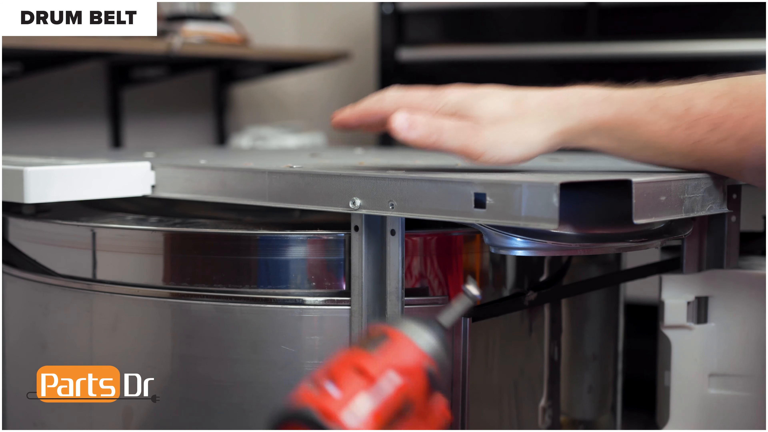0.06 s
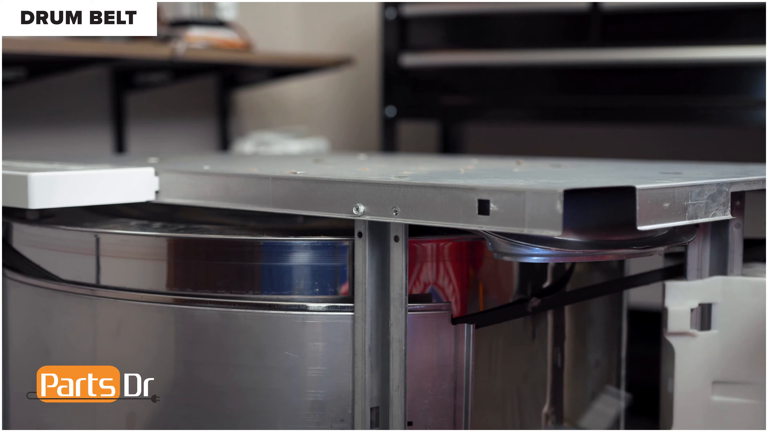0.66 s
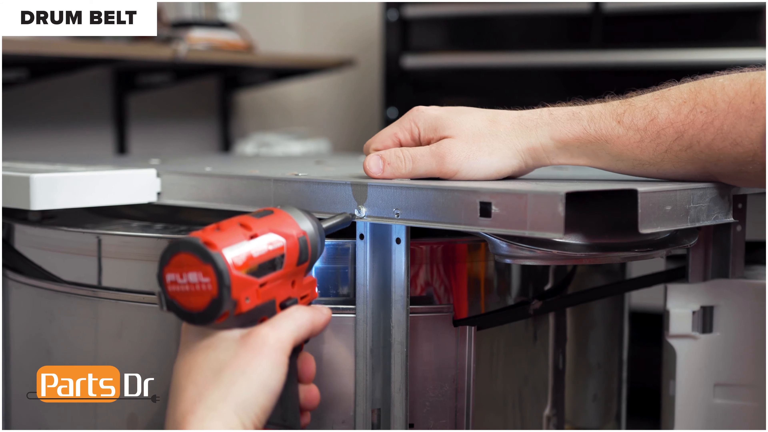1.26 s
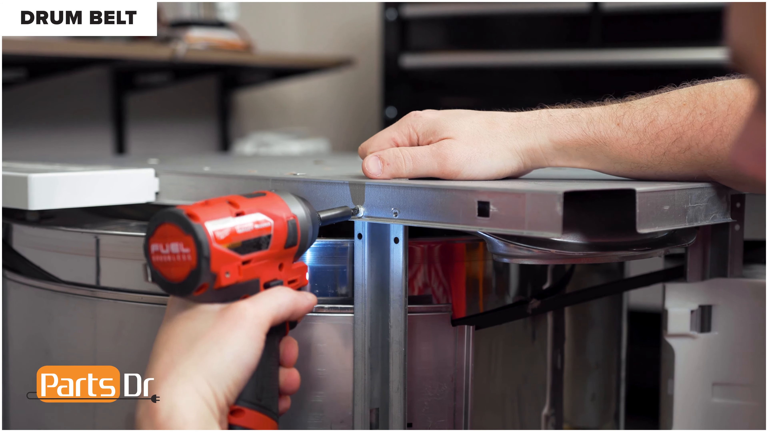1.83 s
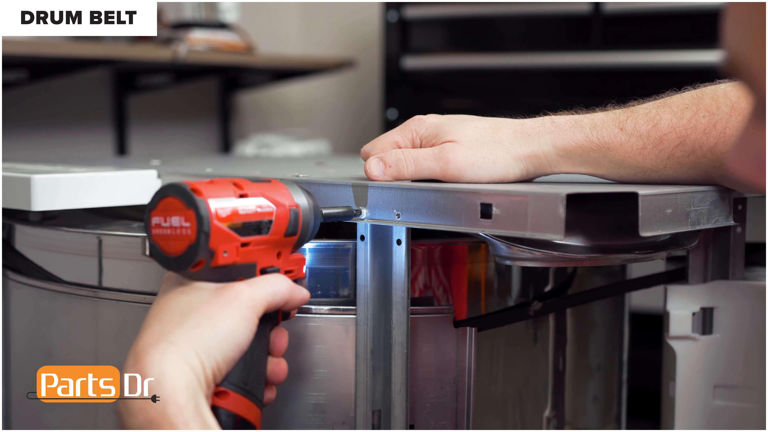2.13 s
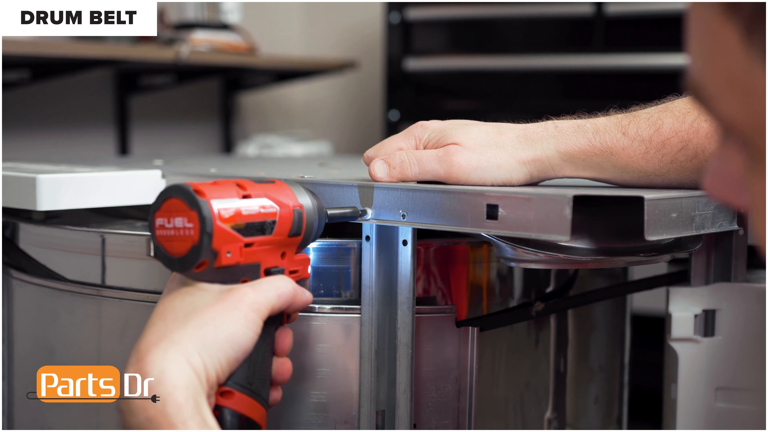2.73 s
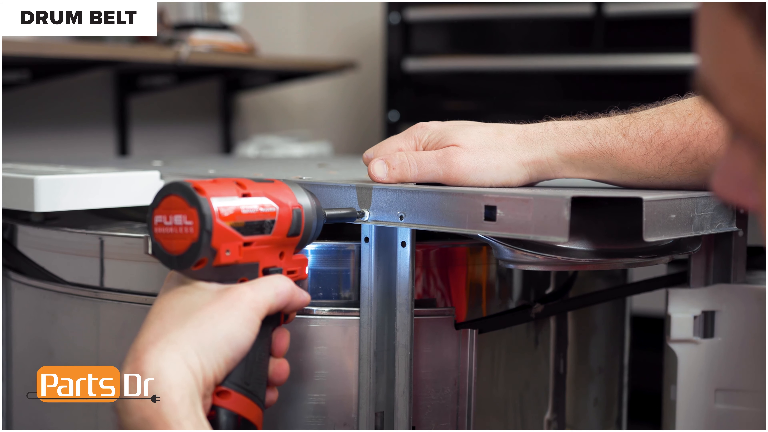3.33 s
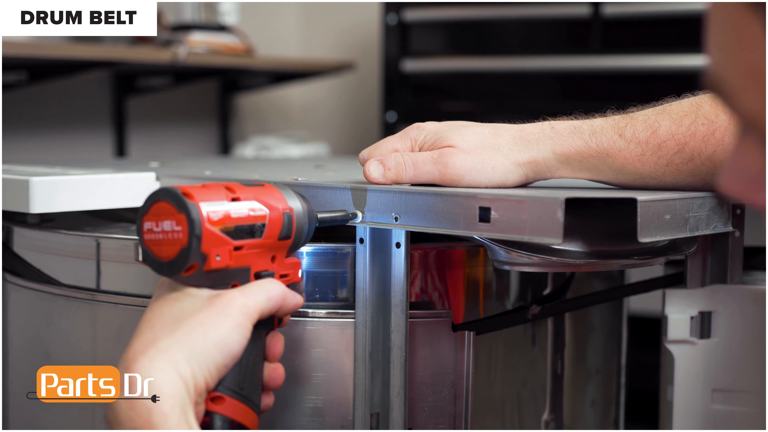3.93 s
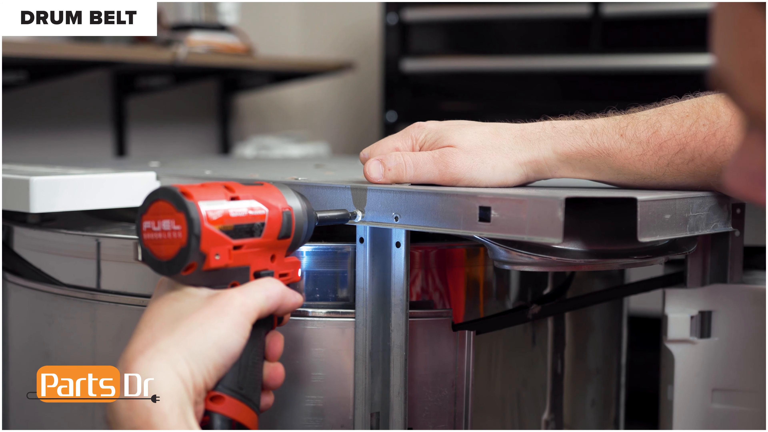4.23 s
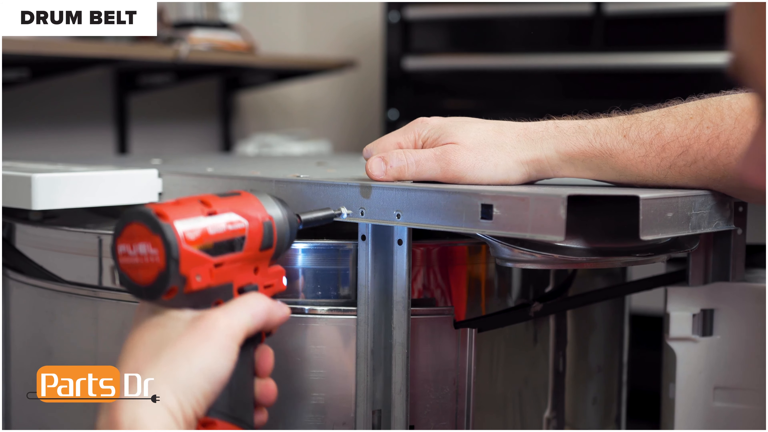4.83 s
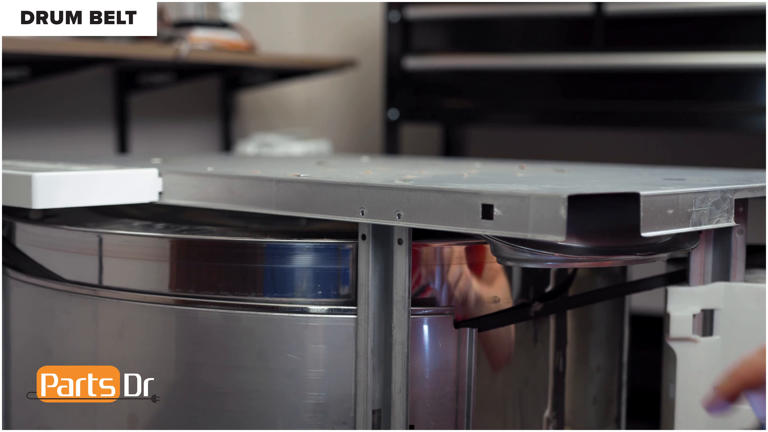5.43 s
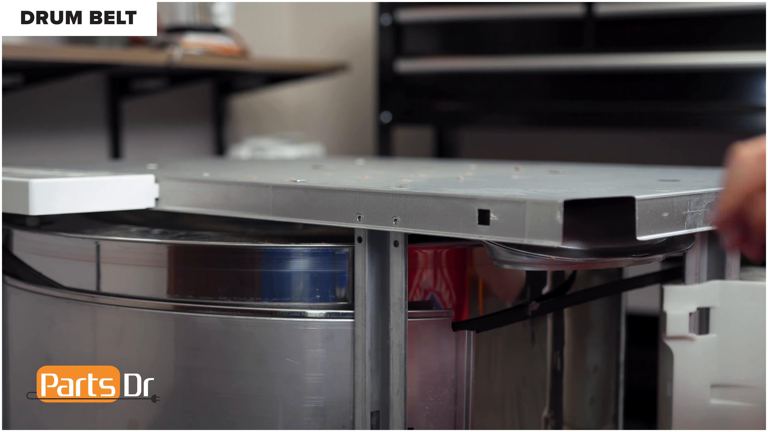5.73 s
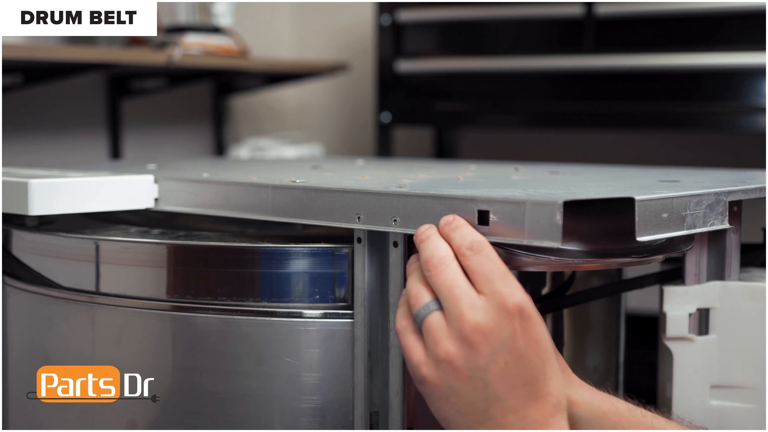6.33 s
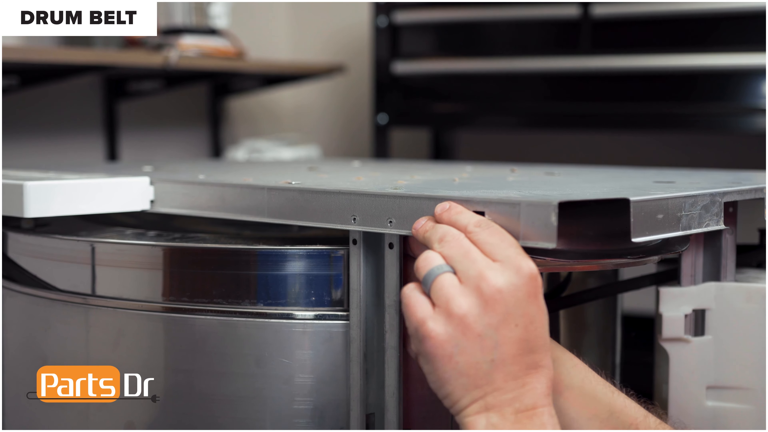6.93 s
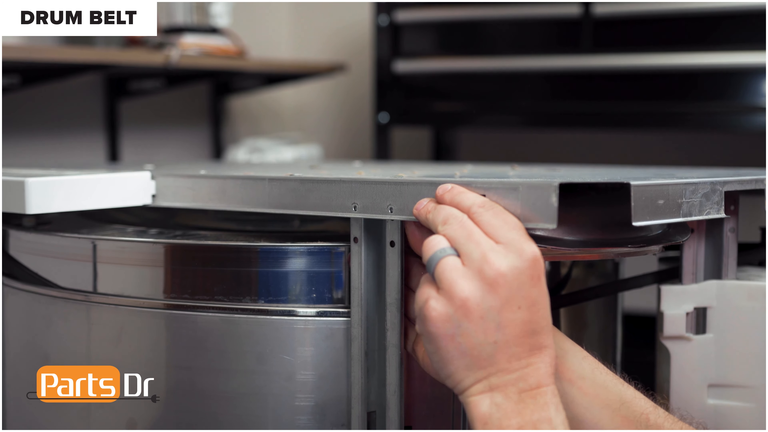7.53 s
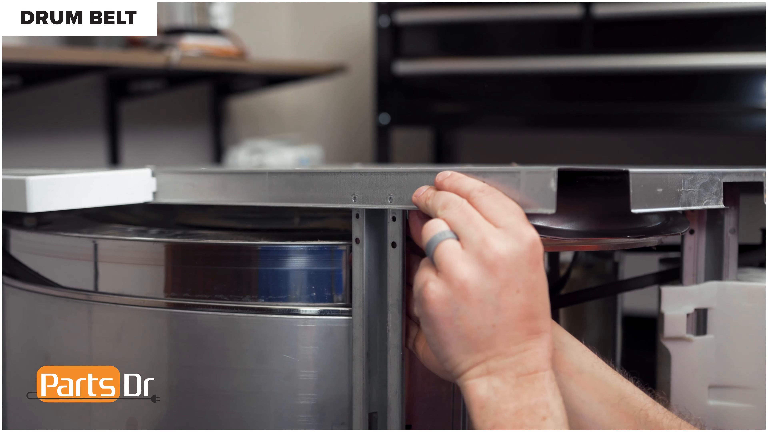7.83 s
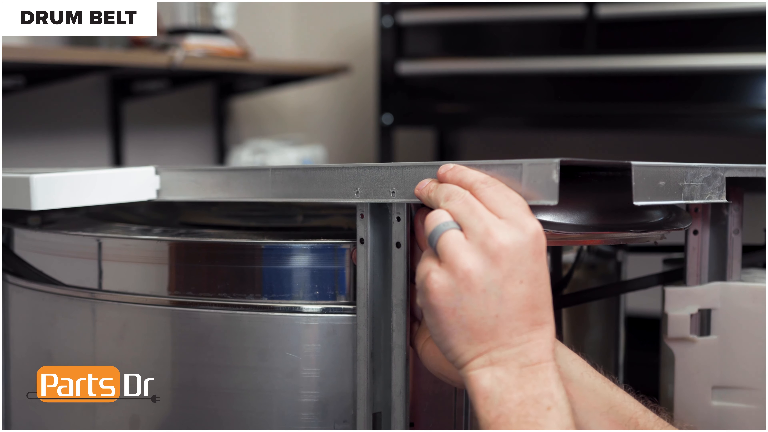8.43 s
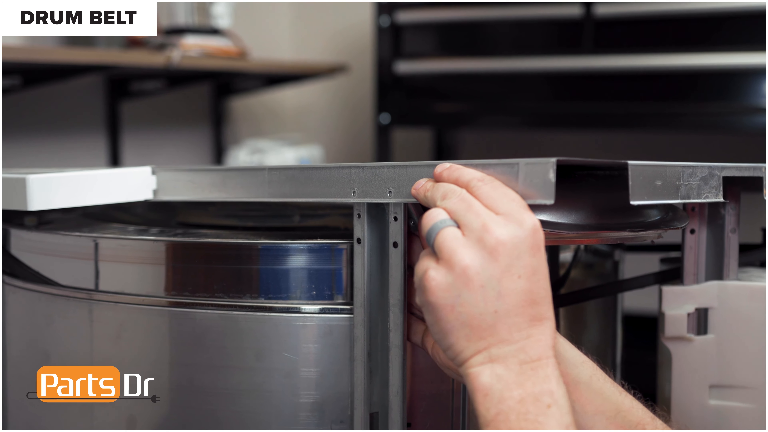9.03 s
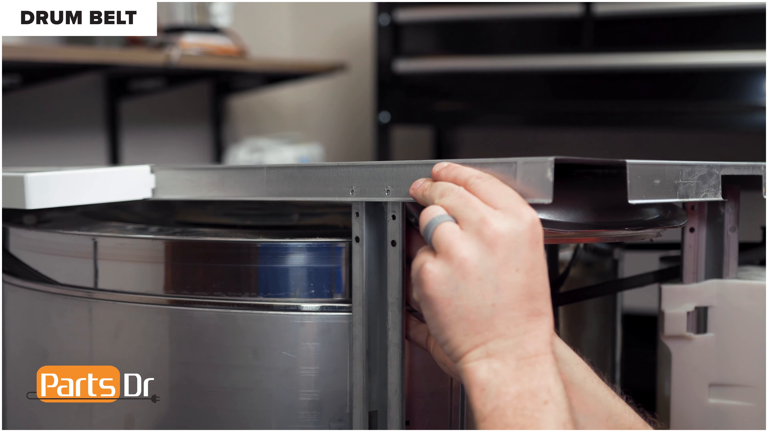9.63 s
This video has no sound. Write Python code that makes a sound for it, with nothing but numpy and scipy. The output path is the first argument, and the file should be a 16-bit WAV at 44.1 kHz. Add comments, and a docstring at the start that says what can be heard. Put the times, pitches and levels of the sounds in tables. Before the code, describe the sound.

Soft rubbing and small ticks open over the low, steady air of a quiet workshop. Between 1.4 and 1.9 seconds a driver bit knocks a few times on a screw in a steel post, followed by light ticks. At 2.7 seconds a cordless impact driver starts whining and rattling; the screw cracks loose with the loudest snap and grinds until about 3.2. A second, faster run starts at 3.5, with a few metallic knocks, and winds down to a sharp click at 4.3. A tiny blip follows at 4.5, then a small pop and faint handling rubs around 5. From about 6.3 seconds hands push up the washing machine's sheet-metal top panel, much more quietly: small creaks and dull knocks, scraping with short low groans from 7.4 to 8.4, and bracket chinks with two brief squeaks near 8.7. Faint creaks and knocks continue until about 9.6.

```python
"""A cordless impact driver backs a screw out of a washing machine's steel post in a quiet workshop.
The bit knocks onto the screw and the motor runs twice: meshing gears whine and rattle, the thread
cracks loose and grinds, and the driver gives a last short blip. Two hands then push up the sheet-metal
top panel: impacts excite its modes, and stick-slip friction on its brackets scrapes, creaks and groans."""
import sys
import numpy as np
from scipy import signal
from scipy.fft import rfft, irfft, next_fast_len
from scipy.io import wavfile
from scipy.ndimage import uniform_filter1d

SR = 44100
rng = np.random.default_rng(int(sys.argv[2]) if len(sys.argv) > 2 else 0)


def digitize_waveform(pressure):
    """Quantize a signal to 16-bit integers and store it at the path in sys.argv[1].

    Rows of a 2-D input are taken as channels; values are limited to [-1, 1].
    """
    field = np.atleast_2d(pressure).T
    bounded = np.clip(field, -1, 1)
    quanta = np.round(bounded * 32767).astype(np.int16)
    wavfile.write(sys.argv[1], SR, quanta)


N = 426447
TIME = np.arange(N) / SR
WORKING_HZ = 300   # the motor's field rate at working speed

# Strong modes of the post, the top panel and a bracket: pitch_hz, level_db, t60_s
POST_MODES = [(128, -7.5, 0.5), (201.3, -19.5, 0.5), (256, -13.5, 0.26), (468.4, -13, 0.94),
              (508.5, -10, 0.46), (536, -3.5, 0.28), (602.3, -9.5, 0.25), (677, -9.5, 0.11),
              (742, -9.5, .2), (887, -3, 0.21), (909, -4.5, 0.14), (965, -1.5, 0.092), (1130, -14.5, 0.2),
              (1196, -14.5, .14), (1443, -8.5, 0.35), (1925, -3.5, 0.17), (2487, -2, .13),
              (2674, -6.5, 0.11), (2775, -5, 0.1), (3200, -10.5, 0.17), (4270, -16, 0.18)]
PANEL_MODES = [(121.3, 2, 0.65), (212, 6.5, 0.13), (262.5, -5.5, 0.82), (382, 5, 0.22), (411, -4.5, 0.76),
               (482.3, 1.5, 0.27), (517, -7.5, 0.69), (850, -7.5, 0.61), (930, -4, 0.28), (1064, -5, 0.37),
               (1130, -6, 0.31), (1130, -19, 0.19), (1320, 1.5, 0.16), (1850, -2, 0.25), (2260, 5.5, 0.1),
               (3430, -8, 0.1)]
BRACKET_MODES = [(2300, -18, 0.32), (2850, -4, 0.4), (3060, 6.5, 0.17), (3620, 0, 0.16), (5570, -11, 0.2),
                 (6300, 1, 0.082), (7430, -7, 0.17)]
# Spectra of the dense modes of post and panel: frequency_hz, density_db
POST_WASH = [(60, -2.5), (125, 5.5), (245, -2), (350, -4), (500, 3.5), (660, 1.5), (900, 4.5), (1200, -2.5),
             (1900, 1), (2700, 5.5), (3600, -14.5), (4700, -7.5), (6000, -10.5), (9000, -12), (16000, -20)]
PANEL_WASH = [(60, -14), (120, 1), (250, 2.5), (450, 4), (900, 4), (1450, 1.5), (2200, -1), (3200, -3),
              (4500, -9), (6500, -10.5), (10000, -9), (16000, -27)]
# Decay of the steel's dense modes and the room: frequency_hz, t60_s
STEEL_DECAY = [(100, 0.88), (260, 0.73), (700, 0.36), (1500, 0.32), (3000, 0.23), (4500, 0.22),
               (6000, 0.16), (13000, 0.11)]
# Spectrum of sliding friction: frequency_hz, density_db
FRICTION_SPECTRUM = [(1000, -5.5), (2500, 3), (4500, -2), (7000, -5.5), (11000, -10.5), (16000, -9.5)]


def driver(loose_s=2.80, field_cycles_per_turn=29):
    """Load modulation: once loose, the thread binds once a turn, slowing the gears and grinding harder."""
    field_hz = motor_speed()
    turning = TIME > loose_s
    binding = np.cos(2 * np.pi * np.cumsum(field_hz * turning) / (field_cycles_per_turn * SR))
    sound = gears(field_hz, binding) + turning * thread_grind(field_hz, binding)
    return workshop(sound, wet_db=-16.5, t60_s=0.26)


def motor_speed():
    """A rotating field drives the motor: its rate in Hz, zero outside the two runs."""
    # Speed curves of the two trigger pulls: time_s, field_hz
    first_run = [(2.664, 41), (2.70, 188), (2.76, 172), (2.81, 234), (2.86, 287), (2.89, 306), (2.92, 283),
                 (2.95, 307), (2.99, 315), (3.025, 305), (3.065, 280), (3.11, 207), (3.175, 42),
                 (3.24, 2.84)]
    second_run = [(3.495, 20), (3.53, 195), (3.575, 380), (3.62, 477), (3.66, 497), (3.70, 507),
                  (3.735, 489), (3.78, 441), (3.83, 394), (3.895, 351), (3.991, 308), (4.07, 238),
                  (4.15, 210), (4.235, 140), (4.30, 140), (4.339, 3)]
    return sum(np.interp(TIME, *np.transpose(run), left=0, right=0) for run in (first_run, second_run))


def effort(field_hz, level_db, decade_db, loose_db):
    """Gain follows speed and load: up decade_db per tenfold speed, down loose_db as the screw comes out."""
    backed_out = np.cumsum(field_hz) / field_hz.sum()
    decades = np.log10(field_hz / WORKING_HZ + 1e-9)
    return from_db(level_db + decade_db * decades - loose_db * backed_out)


def gears(field_hz, binding, mesh_per_cycle=.778, sag=.012, jitter=.006, flutter_db=6.5):
    """Gear meshing: loaded teeth whine at harmonics of the mesh rate, slack ones rattle."""
    # Partials of the whine: mesh_multiple, level_db
    orders = [(6, -4), (7, -6.5), (8, -4), (9, -1.5), (10, -5.5), (11, -8), (12, 1.5), (13, -6), (14, 1),
              (15, -6.5), (16, -1.5), (17, -6), (18, -1), (19, -5.5), (20, -2.5), (22, -3), (24, -2),
              (26, -4.5), (28, -3), (32, -4)]
    # Radiation efficiency of the gear case: frequency_hz, gain_db
    radiation = [(500, -8), (1500, -7), (2300, -3.5), (2750, -1.5), (3050, -1), (3300, 3.5), (3550, 3),
                 (3850, -8), (4650, -11.5), (5400, -11), (7500, -13.5), (12000, -22)]
    mesh_hz = mesh_per_cycle * field_hz * (1 - sag * binding + jitter * drift(160))
    mesh = 2 * np.pi * np.cumsum(mesh_hz) / SR
    whine = rms_one(sum(from_db(db + flutter_db * drift(70)) * np.sin(round(k) * mesh)
                        for k, db in orders))
    whine = even(colour(whine + resonances(whine), radiation))   # partials flare at each resonance
    whine_share = np.clip(field_hz / WORKING_HZ, 0, 1) * effort(field_hz, 1.5, decade_db=0, loose_db=6)
    field_pulse = 1 + 0.37 * np.cos(mesh / mesh_per_cycle)
    rattle = rms_one(grains(7000, 1.5) * field_pulse * from_db(1.5 * drift(180)))
    teeth = workshop(housing(rattle) + whine_share * whine, wet_db=-9, t60_s=0.15)
    return effort(field_hz, -24.5, decade_db=24, loose_db=11) * even(teeth)


def housing(x):
    """Radiation from the gear case shapes the spectrum of a rattle."""
    # Radiated spectrum: frequency_hz, density_db
    spectrum = [(180, -29), (300, -10), (511, -1), (645, -9.5), (930, -4), (1230, -8), (1430, -3),
                (1640, -7.5), (2700, -3.5), (4440, -9.5), (5340, -12.5), (7500, -14.5), (9880, -18.5),
                (16000, -30.5)]
    return colour(x + resonances(x), spectrum)


def resonances(x):
    """Resonance of the gear case and bit favours a few pitches."""
    # Resonant peaks: pitch_hz, width_hz, weight_db (halved in use)
    peaks = [(887, 170, 2), (1390, 70, -2), (2080, 30, -5.5), (2656, 70, 3), (2866, 55, 1), (3300, 110, -3),
             (5370, 100, -3.5), (7610, 490, -15), (8620, 56, -19)]
    return sum(from_db(db / 2) * signal.lfilter(*signal.iirpeak(hz, hz / width_hz, fs=SR), x)
               for hz, width_hz, db in peaks)


def thread_grind(field_hz, binding, lag_s=0.058, binding_db=2.5):
    """Friction in the turning thread drives the post's damped modes with random slips."""
    # Filter on the grinding: frequency_hz, gain_db
    spectrum = [(30, -25), (70, -9.5), (95, -7.5), (125, -4.5), (180, -4), (270, -1), (380, -4), (510, -11),
                (640, -13.5), (930, -8), (1400, -11.5), (2200, -17), (3500, -33.5)]
    slips = grains(900, 2.2) * from_db(7.1 * drift(40))
    post = steel(POST_MODES, POST_WASH, modes_db=-23.5) * np.exp(-TIME[:SR] / 0.028)
    grind = even(colour(excite(slips, post), spectrum))
    pole = np.exp(-1 / (lag_s * SR))   # the screw follows the motor's speed late
    lagged_hz = np.minimum(signal.lfilter([1 - pole], [1, -pole], field_hz), 3 * field_hz)
    return effort(lagged_hz, -29, decade_db=19, loose_db=13) * from_db(binding_db * binding) * grind


def hammer(pitch_hz=3450, width_hz=130, level_db=-44, loudest_at_hz=80):
    """Mechanical play lets the hammer jingle at its resonance while the motor starts and stops."""
    speed_squared = (motor_speed() / loudest_at_hz) ** 2
    resonator = signal.iirpeak(pitch_hz, pitch_hz / width_hz, fs=SR)
    ring = rms_one(signal.lfilter(*resonator, grains(1500, 1.5)))
    return from_db(level_db) * speed_squared * np.exp(1 - speed_squared) * ring


def inverter(switching_hz=9803, carrier_db=-67.5, press_s=2.665, release_s=4.305):
    """Amplitude modulation: turning under load adds two sidebands to the motor's switching tone."""
    field_hz = motor_speed()
    field_phase = 2 * np.pi * np.cumsum(field_hz) / SR
    trigger = uniform_filter1d(1. * (TIME > press_s) * (TIME < release_s), size=200)
    load = effort(field_hz, -49.5, decade_db=0, loose_db=5.5) * np.minimum(field_hz / WORKING_HZ, 1)
    amplitude = np.sqrt(2) * from_db(carrier_db) + 2 * load * from_db(3 * drift(25)) * np.cos(field_phase)
    return trigger * amplitude * np.sin(2 * np.pi * switching_hz * TIME)


def driver_blip(start_s=4.52, length_s=0.078, level_db=-42.5):
    """A last short rattle of the driver's mechanism excites the case's resonances, brightest at its peak."""
    burst = strokes([(start_s, length_s, 0)], attack_s=0.04, release_s=0.023)
    hiss = from_db(-18) * burst ** 2 * colour(grains(5000, 3.6), FRICTION_SPECTRUM)
    bite = from_db(-8) * rms_one(band(grains(1500, 2.3), 2600, 3500))
    body = from_db(0.5) * band(housing(grains(4800, 1.6)), 420, 10000)
    return workshop(from_db(level_db) * burst * (body + bite + hiss), wet_db=-6.5, t60_s=0.23)


def post_knocks():
    """Impacts of bit, hammer and screw set the steel post vibrating freely."""
    # Impacts: start_s, level_db, bright_db, thud_db, boom_db, tail_db, build_s
    impacts = [(1.437, -33, 3, -49.5, -43.5, -3, 0.00068), (1.44, -34.5, -8, -36, -28.5, -13, 0.0007),
               (1.676, -61, -11, -51.5, -54, 4, .003), (1.69, -35, 5.5, -48, -48, -10, 0.00086),
               (1.875, -52.5, -14.5, -55.5, -52.5, -3, .002),
               (1.895, -45.5, -5.5, -58.5, -53.5, -14, 0.0028), (1.904, -36, 8, -38.5, -48.5, 4.5, 0.0007),
               (1.917, -35, -3, -49.5, -37, -12.5, 0.0011), (2.669, -38, 4, -61.5, -51.5, -16.5, 0.001),
               (2.706, -23.5, 6, -27, -33.5, -11.5, .003), (2.784, -28, 2.5, -44.5, -42, -15.5, .002),
               (2.7905, -10, 7.5, -33, -30, -18, 0.0011), (2.798, -15, 5, -31.5, -31, -16.5, .0006),
               (3.553, -42, 20.5, -55, -50, -5, 0.0045), (3.57, -44, 14, -41.5, -47, -10, 0.0032),
               (3.854, -29.5, 5, -51, -36, -14, 0.0037), (3.865, -30, -9, -28, -40, -10, 0.0013),
               (3.953, -33.5, -7, -39, -34.5, -20, 0.0056), (4.11, -50, -7, -38, -55, -2, .006),
               (4.302, -34.5, 5.5, -79, -71, -20, 0.00044), (4.315, -47.5, 14, -68, -51, -22, .0005)]
    return blows(impacts, POST_MODES, POST_WASH, STEEL_DECAY, modes_db=-7.5, top_db=-9.5, dulling=1.6)


def panel_knocks():
    """Impacts on the brackets excite the top panel's modes, which the hands damp."""
    # Impacts: start_s, level_db, bright_db, thud_db, boom_db, tail_db, build_s
    impacts = [(0.217, -62.5, -16, -47.5, -50.5, -11, 0.0018), (0.636, -67, -12, -59.5, -62, -17, .001),
               (6.335, -66, -19.5, -71, -48.5, -2, 0.0013), (6.952, -46, 9, -70, -53, -5, 0.0004),
               (7.358, -42.5, -5, -57, -48, -8, 0.0035), (7.366, -41.5, -6, -43, -42.5, -13, 0.0055),
               (7.864, -45, 2.5, -56, -46, -13.5, 0.007), (7.975, -56, -5, -70, -44.5, -3, 0.0055),
               (8.312, -56, -7, -50, -46, -2, .001), (8.355, -44.5, -3, -40, -55, 14, 0.0068),
               (8.43, -41, 1, -54, -52, -11.5, 0.0034), (8.658, -63, -7, -62.5, -48, 22, 0.0015),
               (8.704, -51, 5, -63, -56, -5, .0015), (8.729, -52, 6.5, -59, -49, -5, 0.0032),
               (9.048, -45.5, -5, -56, -45.5, -12.5, 0.0018), (9.252, -56, 5, -54, -58, -32, .0015),
               (9.567, -55, -5.5, -65.5, -47, -4, 0.0009)]
    # Decay of the held panel: frequency_hz, t60_s
    decay = [(100, 0.53), (260, 0.84), (700, 0.23), (1500, 0.28), (3000, 0.2), (4500, 0.098),
             (13000, 0.084)]
    return blows(impacts, PANEL_MODES, PANEL_WASH, decay, modes_db=-19, top_db=-11, dulling=0.22)


def lifting(attack_s=0.0099, release_s=0.084, ring_share=0.44, grit_db=-64):
    """Forced vibration: the rising panel rings in its modes as its edge scrapes over the brackets."""
    # Pushes of the hands: start_s, length_s, level_db, relative_rumble_db
    pushes = [(6.95, 0.28, -64, 0), (7.42, 0.17, -51.5, -11), (7.58, 0.4, -50, -10),
              (7.76, 0.25, -49.5, -7.5), (8.131, 0.06, -44.5, -9.5), (8.339, 0.16, -47.5, -22),
              (8.68, 0.19, -60.5, -21), (8.9, 0.35, -62, 0), (9.17, 0.094, -53.5, -14),
              (9.338, 0.45, -61, 2)]
    # Filter on the panel's drone: frequency_hz, gain_db
    drone = [(150, -29), (260, -5.5), (400, 2), (530, 0), (620, -0.5), (850, -0.5), (1400, -6.5),
             (2500, -12.5), (3500, -13.5), (4800, -25), (8000, -60.5)]
    scrape = colour(excite(grains(1200, 6.0), steel(PANEL_MODES, PANEL_WASH, modes_db=-18.5)), drone)
    ring = colour(excite(grains(400, 2.1), ringing(PANEL_MODES)), drone)
    body = even(even(scrape) + ring_share * even(ring))
    moving = strokes([(s, length_s, 0) for s, length_s, *_ in pushes], attack_s, release_s)
    grit = from_db(grit_db) * band(grains(1500, 3.0), 1500, 3400) * from_db(3 * drift(24))
    return moving * grit + sliding(pushes, body, attack_s, release_s, hiss_db=-71)


def groans(sharp=0.045, settle_s=0.032, waver=0.0068, rough_db=3.5):
    """Periodic stick-slip gives harmonic groans that start sharp and sink as the panel gives way."""
    # Groans of the panel's edge: start_s, length_s, level_db, slip_hz
    events = [(7.49, 0.05, -58, 273), (7.563, 0.055, -45, 262.2), (7.636, 0.03, -50, 179.4),
              (7.685, 0.071, -51, 195.6), (7.748, 0.05, -46, 263.3), (7.871, 0.03, -51.5, 264),
              (7.956, 0.026, -50, 193.7), (8.152, 0.048, -46, 191.2), (8.273, 0.06, -64, 187)]
    # Their partials: slip_multiple, level_db
    harmonics = [(1, -9), (2, -0.5), (3, -15), (4, -15), (5, -23)]
    out, size = np.zeros(N), SR // 2
    unsteady, rough = 1 + waver * drift(70), from_db(rough_db * drift(45))
    sink = 1 + sharp * np.exp(-TIME[:size] / settle_s)
    for start_s, length_s, level_db, slip_hz in events:
        span = slice(round(start_s * SR), round(start_s * SR) + size)
        phase = 2 * np.pi * np.cumsum(slip_hz * unsteady[span] * sink) / SR
        tone = sum(from_db(db) * np.sin(round(k) * phase + rng.uniform(0, 2 * np.pi))
                   for k, db in harmonics)
        envelope = strokes([(start_s, length_s, level_db)], attack_s=0.013, release_s=0.075)
        out[span] += rms_one(tone) * rough[span] * envelope[span]
    return out


def creaks(slips_per_s=420, uneven=0.3, ring_s=0.004, ring_db=-17):
    """Irregular stick-slip: the panel's edge catches and lets go, each slip briefly ringing a bracket."""
    # Runs of slips: start_s, length_s, level_db
    runs = [(6.414, 0.013, -58), (6.483, 0.023, -56), (6.532, 0.018, -60.5), (6.62, 0.05, -63),
            (7.04, 0.024, -61), (7.078, 0.03, -58), (7.118, 0.012, -60.5), (7.208, 0.026, -59.5),
            (7.232, 0.014, -58.5), (8.165, 0.017, -54), (8.526, 0.016, -53.5), (8.978, 0.012, -61),
            (9.02, 0.02, -59), (9.156, 0.013, -57), (9.186, 0.013, -56), (9.32, 0.017, -64),
            (9.382, 0.041, -61.5), (9.494, 0.011, -63), (9.516, 0.0089, -60.5), (9.618, 0.017, -59)]
    # Creak spectrum: frequency_hz, density_db
    spectrum = [(300, -16), (800, 9), (1500, 4), (2600, 6), (3300, -6), (4300, -12.5), (6000, -13),
                (9000, -16.5), (16000, -26)]
    travel = np.cumsum(slips_per_s * np.exp(uneven * drift(300))) / SR
    slips = np.diff(np.floor(travel), prepend=0) * from_db(3.7 * drift(500)) * rng.choice([-1, 1], N)
    ring = excite(slips, ringing(BRACKET_MODES) * np.exp(-TIME[:SR] / ring_s))
    grit = even(colour(rms_one(slips) + from_db(ring_db) * rms_one(ring), spectrum))
    return workshop(strokes(runs, attack_s=0.0033, release_s=0.0062) * grit, wet_db=-9, t60_s=0.18)


def chinks(damping_s=0.034):
    """Damped free vibration: a thin bracket rings high and the hands soon still it."""
    # Contacts on a bracket's edge: start_s, peak_db
    contacts = [(6.952, -39.5), (7.866, -42.5), (8.431, -52), (8.707, -54), (8.73, -40)]
    out = np.zeros(N)
    for start_s, peak_db in contacts:
        ring = ringing(BRACKET_MODES) * np.exp(-TIME[:SR] / damping_s)
        add(out, start_s, from_db(peak_db) * ring / np.abs(ring).max())
    return out


def squeaks(length_s=0.012, waver=0.018):
    """Fast stick-slip of steel on steel gives short, wavering chirps."""
    # Slips of a bracket's edge: start_s, level_db
    slips = [(8.698, -46), (8.725, -45.5)]
    # Squeak partials: pitch_hz, level_db
    partials = [(1950, -3), (2300, -2), (2650, -5.5), (3500, -12), (5560, -6), (6700, -10)]
    phase_per_hz = 2 * np.pi * np.cumsum(1 + waver * drift(300)) / SR
    tone = sum(from_db(db) * np.sin(hz * phase_per_hz) for hz, db in partials)
    return tone * strokes([(s, length_s, db) for s, db in slips], attack_s=0.0073, release_s=0.012)


def ticks(decay_s=0.0027, tail_s=0.049, trim_db=-1.5):
    """Brief contacts of screw, bit and fingers radiate broadband snaps with a faint tail."""
    # Light contacts: start_s, level_db, pitch_hz (near the top of the noise band)
    contacts = [(0.017, -43, 3120), (0.055, -43, 3140), (0.372, -46.5, 4280), (0.482, -41.5, 16500),
                (0.486, -50, 3470), (0.996, -55, 7000), (2.2084, -44.5, 6000), (2.266, -48, 6460),
                (2.318, -48, 6300), (2.358, -46.5, 6170), (2.39, -52, 6500), (2.4274, -49.5, 6400),
                (2.613, -41.5, 5470), (4.306, -16.5, 3400), (4.315, -30, 4210), (4.456, -46.5, 6960),
                (4.527, -36, 3800), (4.577, -30.5, 17000), (4.7954, -42.5, 4250), (4.946, -44, 5000),
                (4.988, -48, 4050), (4.999, -50, 8000), (5.022, -52, 7500), (5.3155, -44.5, 4230),
                (5.5613, -49, 6400), (6.1707, -49, 7000), (6.178, -52, 7000), (6.189, -54, 6480),
                (6.2007, -51, 7000), (6.2195, -50, 6430), (8.095, -46.5, 2950), (8.272, -44, 5040),
                (8.404, -47, 3500)]
    out, t = np.zeros(N), TIME[:SR // 10]
    envelope = np.exp(-t / decay_s) + from_db(-26.5) * np.exp(-t / tail_s)
    for start_s, level_db, hz in contacts:
        snap = band(rng.standard_normal(len(t)) * envelope, hz / 5, hz * 0.93)
        add(out, start_s, from_db(level_db + trim_db) * snap / np.abs(snap).max())
    return out


def pop(start_s=4.9345, peak_db=-28, rise_s=0.00009):
    """A single pressure pulse that excites no resonance."""
    out, age = np.zeros(N), TIME[:SR // 10] / rise_s
    add(out, start_s, -from_db(peak_db) * age * np.exp(1 - age))
    return out


def rubbing():
    """Friction of hands and tool drives the cabinet's dense modes, which answer dully."""
    # Rubs: start_s, length_s, level_db, relative_rumble_db
    rubs = [(0.0, 0.17, -50, -0.5), (0.28, 0.22, -63.5, 0), (1.21, 0.043, -48.5, 5.5),
            (2.2, 0.16, -57, 0.5), (2.37, 0.073, -47, -2), (3.17, 0.32, -60, 0), (4.97, 0.25, -51.5, 1.5),
            (5.3, 0.18, -63.5, -1), (6.465, 0.068, -53, 0), (6.62, 0.5, -59, -16)]
    # Filter on the cabinet's response: frequency_hz, gain_db
    spectrum = [(150, -19.5), (250, -6.5), (450, -2), (700, -6), (880, -3), (1300, -10.5), (2200, -13.5),
                (3400, -16.5), (4800, -38), (8000, -61)]
    cabinet = colour(excite(grains(600, 4.146), wash(PANEL_WASH, STEEL_DECAY)), spectrum)
    return sliding(rubs, even(cabinet), attack_s=0.0265, release_s=0.08, hiss_db=-73)


def hisses():
    """Friction noise: soft brushing hisses, plus the bright hiss of the driver's last blip."""
    # Bursts of hiss: start_s, length_s, level_db
    bursts = [(0.08, 0.11, -62.5), (0.38, 0.13, -71), (0.83, 0.03, -63.5), (0.98, 0.21, -71),
              (1.2, 0.064, -58), (2.44, 0.088, -82), (3.38, 0.12, -69), (4.56, 0.016, -44),
              (4.99, 0.18, -62), (5.34, 0.15, -72), (5.63, 0.12, -65), (6.16, 0.041, -69),
              (6.335, 0.45, -69.5), (7.05, 0.072, -71), (7.215, 0.024, -64), (8.1, 0.1, -69.5)]
    return strokes(bursts, attack_s=0.023, release_s=0.016) * friction()


def workshop(x, wet_db, t60_s):
    """Early reflections off benches and the machine's panels decay exponentially."""
    t = TIME[:SR // 2]
    echoes = rng.standard_normal(len(t)) * from_db(-60 * t / t60_s) * (t > .002)
    return x + from_db(wet_db) * excite(x, echoes / np.linalg.norm(echoes))


def room_air(level_db=-59.5):
    """The ambient noise floor: steady and strongest in the bass."""
    # Room spectrum: frequency_hz, density_db
    spectrum = [(15, -28.5), (25, -5.5), (49, -3.5), (84, -3.5), (130, 2), (212, -12.5), (301, -7.5),
                (394, -13.5), (1290, -20), (2160, -27), (3340, -30), (6740, -33), (10100, -34),
                (11600, -34.5), (16000, -48.5)]
    return from_db(level_db) * colour(rng.standard_normal(N), spectrum)


def blows(impacts, modes, spectrum, decay, modes_db, top_db, dulling, hard_db=7):
    """Impact excitation: each contact builds, cracks and rings; harder ones favour the upper registers."""
    # Decay of the first burst: frequency_hz, t60_s
    crack_decay = [(100, 0.082), (700, 0.025), (2500, 0.054), (5000, 0.008), (13000, 0.014)]
    out, edges_hz = np.zeros(N), (80, 350, 650, 1200, 3500, 6500, 15000)
    # blows alternate between two random variants of the same steel ring
    variants = np.array([(wash(spectrum, crack_decay), steel(modes, spectrum, modes_db, decay))
                         for _ in range(2)])
    registers = [band(variants, low, high) for low, high in zip(edges_hz, edges_hz[1:])]
    for k, (start_s, level_db, bright_db, thud_db, boom_db, tail_db, build_s) in enumerate(impacts):
        onset = 1 - np.exp(-TIME[:SR] / max(build_s, 1e-4))
        treble_db = level_db + bright_db + top_db
        sheen_db = treble_db - 6.5 - dulling * max(hard_db - bright_db, 0)
        for j, db in enumerate((thud_db, boom_db, level_db - bright_db, level_db, treble_db, sheen_db)):
            crack, tail = registers[j][k % 2]
            part = (-1) ** j * onset * (crack + from_db(tail_db) * tail)
            peak_rms = np.sqrt(uniform_filter1d(part ** 2, size=300).max())
            add(out, start_s, from_db(db) * part / peak_rms)
    return out


def sliding(moves, body, attack_s, release_s, hiss_db, uneven_db=1.5):
    """Sliding friction sounds the body, shakes the cabinet and hisses at the contact."""
    # Cabinet rumble: frequency_hz, density_db
    rumble = [(30, -32), (70, -7), (125, 2.5), (210, -4), (300, -10), (600, -53.5)]
    force = strokes([move[:3] for move in moves], attack_s, release_s)
    shakes = [(s, length_s, db + rumble_db) for s, length_s, db, rumble_db in moves]
    hiss = from_db(hiss_db) * np.sqrt(force / force.max()) * friction()
    contact = from_db(uneven_db * drift(26)) * (force * body + hiss)
    return contact + strokes(shakes, attack_s, release_s) * colour(rng.standard_normal(N), rumble)


def friction():
    """Many tiny slips merge into an uneven hiss; rms 1."""
    return colour(grains(5000, 3.9) * from_db(2 * drift(24)), FRICTION_SPECTRUM)


def steel(modes, spectrum, modes_db, decay=STEEL_DECAY):
    """Impulse response of a steel part: strong modes over the dense wash."""
    return wash(spectrum, decay) + from_db(modes_db) * ringing(modes)


def wash(spectrum, decay):
    """Modal overlap: modes too dense to tell apart act as noise bands, each dying at its own rate."""
    out, edges_hz = np.zeros(SR), np.geomspace(60, 19000, 25)
    for low, high in zip(edges_hz, edges_hz[1:]):
        centre_hz = np.sqrt(low * high)
        fade = np.exp(-np.minimum(np.log(1000) * TIME[:SR] / at_hz(decay, centre_hz), 20))
        out += band(rng.standard_normal(SR), low, high) * from_db(at_hz(spectrum, centre_hz)) * fade
    return out


def ringing(modes):
    """Modal superposition: a struck part rings as a sum of damped sinusoids."""
    t = TIME[:SR]
    return sum(rng.choice([-1, 1]) * from_db(db - 60 * t / t60_s) * np.sin(2 * np.pi * hz * t)
               for hz, db, t60_s in modes)


def strokes(moves, attack_s, release_s):
    """Envelope of movements that rise, hold and die away; overlaps add in power."""
    power, t = np.zeros(N), TIME[:SR]
    for start_s, length_s, level_db in moves:
        shape = np.minimum(t / attack_s, 1) * np.exp(-np.maximum(t - length_s, 0) / release_s)
        add(power, start_s, (from_db(level_db) * shape) ** 2)
    return np.sqrt(power)


def grains(per_s, spread_db):
    """A Poisson train of slips of uneven size; rms 1."""
    luck = rng.random(N) * SR / per_s
    slip = np.flatnonzero(luck < 1)
    out = np.zeros(N)
    out[slip] = from_db(spread_db * np.minimum(-np.log(luck[slip]), 4)) * (-1.) ** slip
    return rms_one(out)


def drift(rate_hz):
    """Random fluctuation with a spread near 1."""
    return np.interp(TIME * rate_hz, np.arange(4000), rng.standard_normal(4000))


def excite(x, response):
    """Convolution gives a linear system's answer to x."""
    return signal.fftconvolve(x, response)[:N]


def colour(x, spectrum):
    """Filter by a smooth spectrum; rms 1."""
    size = next_fast_len(N, True)
    gain = from_db(at_hz(spectrum, np.fft.rfftfreq(size, 1 / SR)))
    return rms_one(irfft(rfft(x, size) * gain, size)[:N])


def band(x, low_hz, high_hz):
    """Causal band-pass."""
    return signal.sosfilt(signal.butter(2, [low_hz, high_hz], "band", fs=SR, output="sos"), x)


def at_hz(points, hz):
    """Read a table on a log-frequency axis."""
    frequency_hz, value = np.transpose(points)
    return np.interp(np.log(np.maximum(hz, 1)), np.log(frequency_hz), value)


def even(x):
    """Hold the short-term rms at 1."""
    return x / np.sqrt(np.abs(uniform_filter1d(x ** 2, size=2205)) + 1e-9)


def rms_one(x):
    """Scale to unit rms."""
    return x / np.sqrt(np.mean(x ** 2) + 1e-20)


def from_db(db):
    """Decibels to gain."""
    return 10 ** (np.asarray(db) / 20)


def add(out, start_s, sound):
    """Mix a sound in at start_s."""
    i = max(round(start_s * SR), 0)
    out[i:i + len(sound)] += sound[:N - i]


def scene():
    """Superposition of tool, steel and room air at one point."""
    knocks = post_knocks() + panel_knocks()
    air = room_air()
    contacts = chinks() + creaks() + squeaks() + pop() + ticks()
    tool = driver() + hammer() + inverter() + driver_blip()
    scrapes = rubbing() + lifting() + groans() + hisses()
    return (tool + knocks + contacts + scrapes + air)[None]


def record(dry, ceiling=.95, cutoff_hz=15900):
    """Soft saturation rounds the loudest peaks and a steep low-pass cuts the top."""
    low_pass = signal.ellip(10, .1, 70, cutoff_hz, fs=SR, output="sos")
    return signal.sosfilt(low_pass, ceiling * np.tanh(dry / ceiling))


dry = scene()
out = record(dry)
digitize_waveform(out)
```